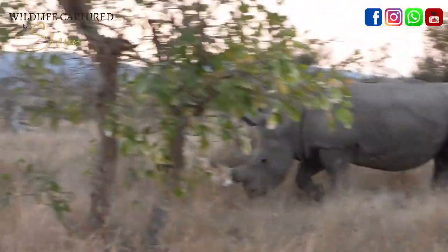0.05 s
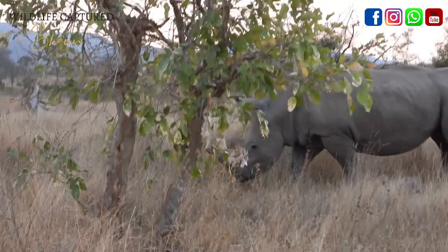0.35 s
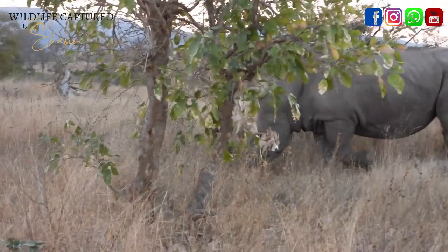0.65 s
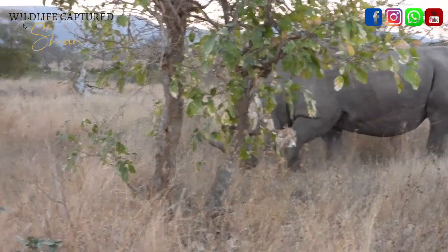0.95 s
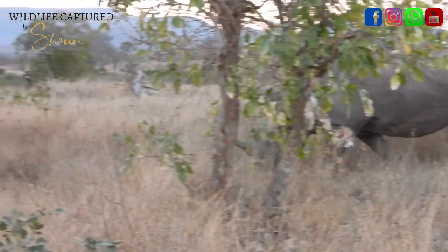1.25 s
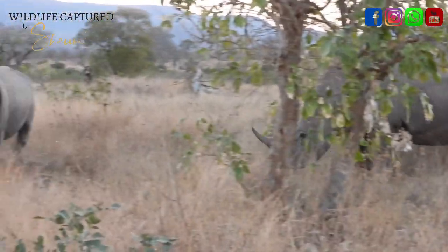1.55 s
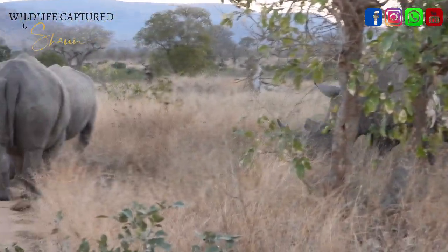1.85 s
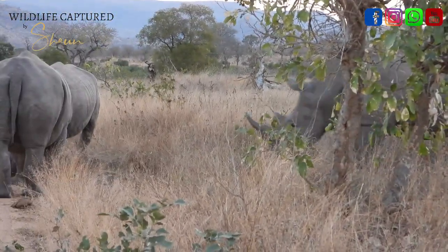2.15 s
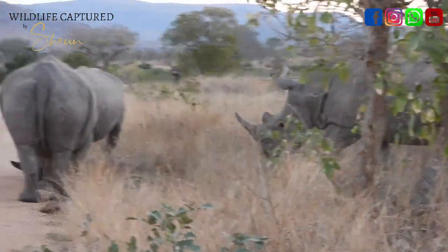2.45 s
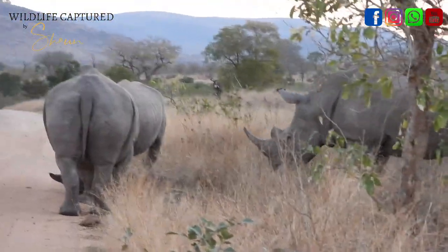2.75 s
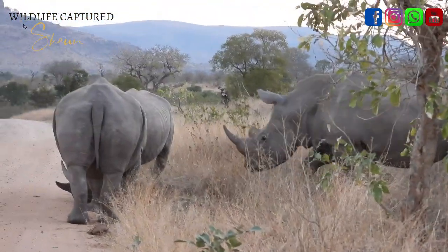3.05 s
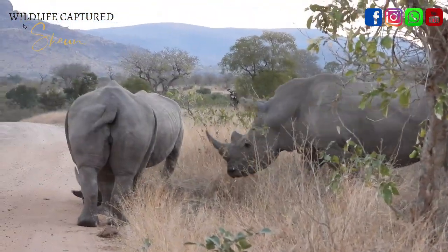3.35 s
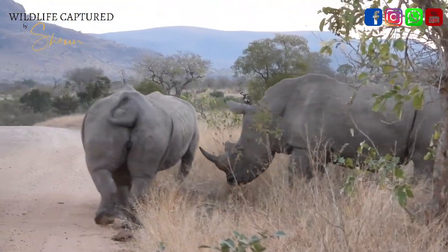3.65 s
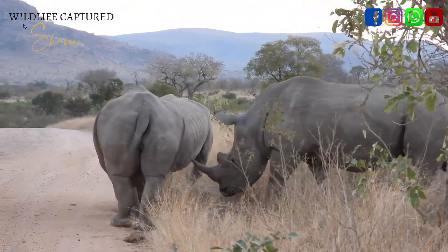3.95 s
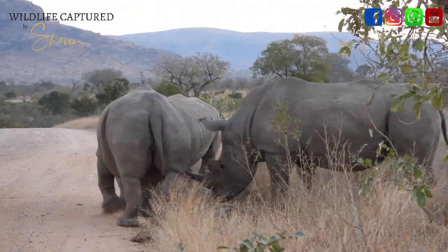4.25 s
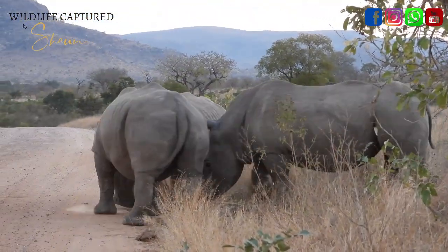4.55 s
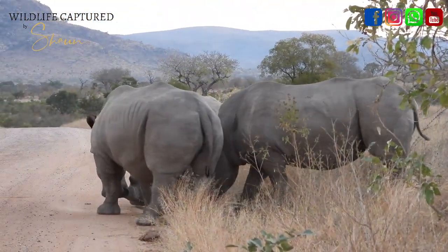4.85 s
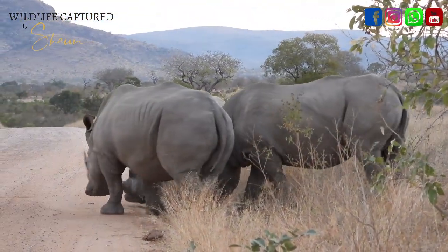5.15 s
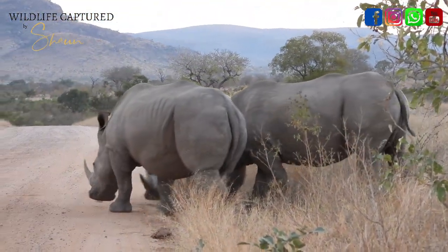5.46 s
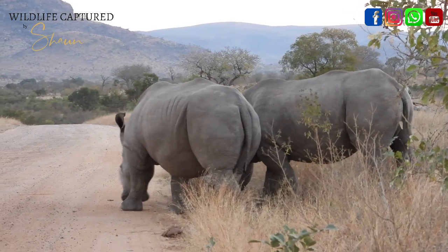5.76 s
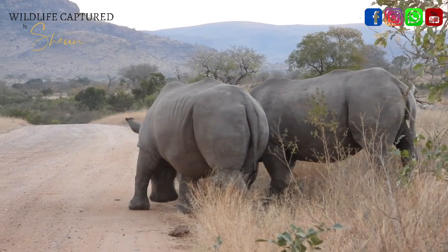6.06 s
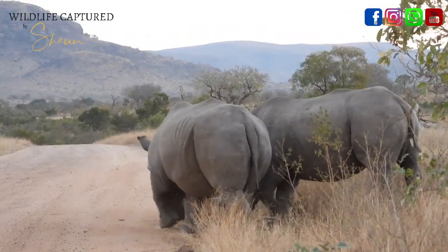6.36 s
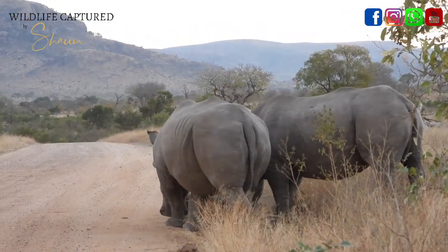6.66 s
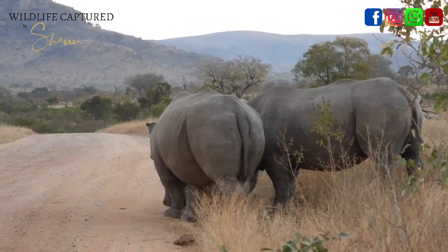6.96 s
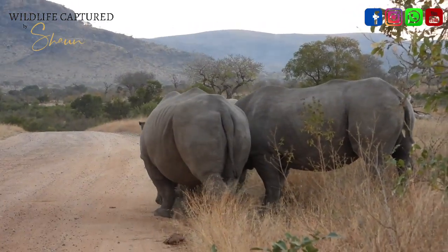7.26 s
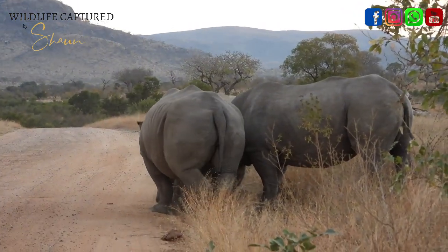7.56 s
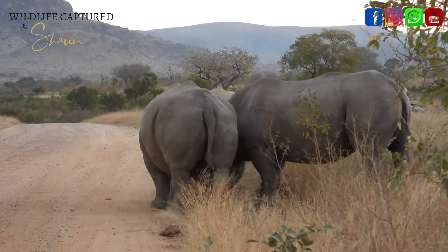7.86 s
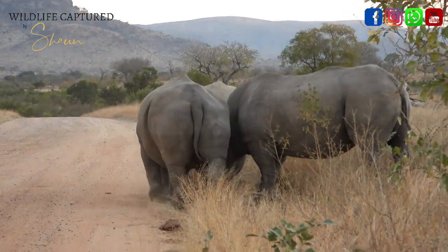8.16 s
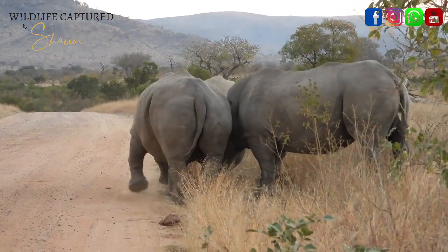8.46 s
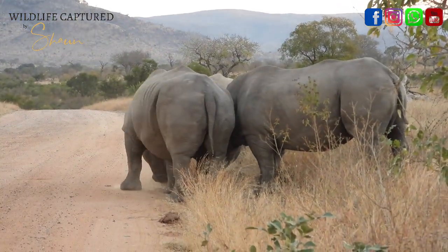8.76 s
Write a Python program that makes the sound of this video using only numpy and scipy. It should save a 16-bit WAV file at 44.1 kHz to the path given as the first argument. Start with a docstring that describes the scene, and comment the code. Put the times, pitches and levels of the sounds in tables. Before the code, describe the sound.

Rhinos shoving each other in open bush pant and squeal softly at first. Two creaking squeaks lead into loud, rasping squeals, two or three a second, which break into two falling runs of chatter. The loudest calls overload the microphone. Afterwards only soft whimpers, bird whistles, a little dry grass rustle and two thin distant squeals remain over a low outdoor rumble.

```python
"""An animal gives harsh squeals, breathy pants and falling runs of chatter over a low outdoor rumble.
It pants and squeals softly at first, turbulent breath ringing the resonances of the throat; a bird whistles.
Falling chatter, two creaking squeaks and whimpers lead to loud rasping squeals from 2.6 s, two or three
a second, which break into two more runs of chatter; the loudest calls overload the input.
After 6.5 s whimpers, birds and rustling dry grass remain, and two thin squeals sound far away."""
import sys
import numpy as np
from scipy import signal
from scipy.fft import rfft, irfft, next_fast_len
from scipy.io import wavfile

SR = 44100
rng = np.random.default_rng(int(sys.argv[2]) if len(sys.argv) > 2 else 0)


def inscribe(sig):
    """Save sig as 16-bit PCM at rate SR to the path in sys.argv[1].

    A 1-D sig is mono; a 2-D sig holds one channel per row.
    Samples are clipped to [-1, 1] before scaling.
    """
    pcm = np.round(np.clip(np.atleast_2d(sig).T, -1, 1) * 32767)
    wavfile.write(sys.argv[1], SR, pcm.astype(np.int16))


N = 388080
TIME, BINS = np.arange(N) / SR, np.fft.rfftfreq(N, 1 / SR)


def amp(db):
    """Amplitude ratio of a level in decibels."""
    return 10 ** (np.asarray(db) / 20)


def unit_rms(x):
    """Normalisation to unit mean power."""
    return x / np.sqrt(np.mean(x ** 2) + 1e-20)


def curve_at(points, hz):
    """Interpolation of (frequency, value) points on a logarithmic frequency axis."""
    f, value = np.transpose(points)
    return np.interp(np.log(hz + 1), np.log(f + 1), value)


def add(mix, start, sound):
    """Superposition: a sound joins the mix at a start time in seconds."""
    part = mix[max(0, round(start * SR)):][:len(sound)]
    part += sound[:len(part)]


def coloured(x, spectrum):
    """Spectral shaping by (frequency, level) points, at unit rms."""
    return unit_rms(irfft(rfft(x) * amp(curve_at(spectrum, np.fft.rfftfreq(len(x), 1 / SR))), len(x)))


def wander(size, hz):
    """Random modulation: complex noise low-passed near hz, at unit rms."""
    f = np.fft.fftfreq(next_fast_len(size), 1 / SR)
    noise = rng.standard_normal((len(f), 2)) @ [1, 1j]
    return unit_rms(np.fft.ifft(noise / (1 + abs(f / hz) ** 3))[:size])


def resonance(hz, width_hz):
    """A resonance driven by turbulence gives a band of noise, here centred on the curve hz."""
    carrier = np.exp(2j * np.pi * np.cumsum(hz) / SR)
    return unit_rms((wander(len(hz), width_hz * 0.74) * carrier).real)


def formants(modes, bend):
    """Parallel resonances, all shifted by the frequency ratio bend, at unit rms."""
    return unit_rms(sum(amp(db) * resonance(hz * bend, width) for hz, width, db in modes))


def swell(t, rise, fall):
    """Raised-cosine envelope, with rise and fall in seconds."""
    return np.sin(np.pi / 2 * np.clip(np.minimum(t / rise, (t[-1] - t) / fall), 0, 1)) ** 2


def puff(modes, length, db):
    """Noise excitation: a soft push of air through steady resonances."""
    t = np.arange(0, length, 1 / SR)
    return amp(db) * formants(modes, np.ones(len(t))) * swell(t, 0.3 * length, 0.57 * length)


# open-air spectrum: (frequency [Hz], relative level [dB])
AIR_SPECTRUM = [(20, 1), (35, -0.5), (70, -6.5), (130, -12.5), (200, -13), (320, -9), (480, -7), (800, -12),
                (1400, -14.5), (2500, -21), (4500, -25.5), (9000, -25.5), (13300, -19.5), (15800, -23)]
# likeness of the two channels: (frequency [Hz], correlation [0-1])
AIR_CORRELATION = [(60, 1), (180, 0.99), (450, 0.92), (1650, 0.79), (5000, 0.57), (10000, 1), (15000, 0.99)]
# level difference between the channels: (frequency [Hz], left minus right [dB])
AIR_BALANCE = [(60, 0.5), (130, -1.5), (300, 4), (1000, 4.5), (5000, 0.5), (10000, -0.5)]
# soft hiss around the calls: (frequency [Hz], relative level [dB])
HISS_SPECTRUM = [(200, -43), (520, -7.5), (900, -1.5), (1200, -16), (1500, -1), (1640, 4.5), (1900, -2.5),
                 (2250, -5.5), (2700, -12.5), (5200, -19.5), (7000, -23), (15000, -35)]
# envelope of that hiss: (time [s], level [dB])
HISS_ENVELOPE = [(0, -41), (1.1, -39), (1.4, -47.5), (1.8, -39.5), (5.4, -39.5), (7.2, -59), (8.8, -48)]


def open_air(air_db=-38.5, hum_hz=102, hum_db=-52.5):
    """Partly correlated noise makes a wide rumble; a wavering hum and a soft hiss lie in the centre."""
    mid, side, hiss = rng.standard_normal((3, N))
    correlation = np.clip(curve_at(AIR_CORRELATION, BINS), 0, 1)
    side = irfft(rfft(side) * np.sqrt((1 - correlation) / (1 + correlation)), N)
    wash = amp(air_db) * np.array([coloured(x, AIR_SPECTRUM) for x in (mid + side, mid - side)])
    balance = amp(np.outer([.5, -.5], curve_at(AIR_BALANCE, BINS)))
    wash = irfft(rfft(wash) * balance, N)
    hum = amp(hum_db) * resonance(np.full(N, hum_hz), width_hz=6.1)
    hiss = coloured(hiss, HISS_SPECTRUM) * amp(np.interp(TIME, *np.transpose(HISS_ENVELOPE)))
    return wash + hum + hiss


# bouts of panting: (time [s], breaths [count], level [dB])
PANTS = [(0, 1, -34), (0.174, 3, -33.5), (.742, 1, -35.5), (0.926, 2, -34.5), (1.505, 1, -40),
         (1.7, 1, -36), (3.911, 2, -35.5), (4.764, 5, -30.5)]
# throat resonances: (frequency [Hz], bandwidth [Hz], relative level [dB])
PANT_FORMANTS = [(1643, 330, 4), (2280, 450, 1.5), (3170, 1060, -2.5), (4760, 1100, -4.5)]


def pants(length=.074, period=.082):
    """Turbulent flow: quick, even breaths excite the broad resonances of the throat."""
    out = np.zeros(N)
    for start, count, db in PANTS:
        for k in range(round(count)):
            add(out, start + k * period, puff(PANT_FORMANTS, length, db))
    return out


def cry(length, db, *, main_hz, main_width_hz, second_hz, second_width_hz, second_db,
        chest, chest_db, rasp, rasp_db, rasp_follow, arch, sharp, whistle,
        flutter, flutter_hz, rise, fall, fade_db, settle_s=0.02573):
    """Source and filter: fluttering air rings the throat, whose resonances glide as the mouth moves."""
    t = np.arange(0, length, 1 / SR)
    position = 2 * t / length - 1
    bend = 1 + arch * (1 / 3 - position ** 2) + sharp * np.exp(-t / settle_s)
    # the main resonance partly locks into an unsteady whistle
    tone_hz = main_hz * bend * (1 + 0.03185 * wander(len(t), 150.4).real)
    tone = np.sqrt(2) * np.sin(2 * np.pi * np.cumsum(tone_hz) / SR)
    voice = np.sqrt(whistle) * tone + np.sqrt(1 - whistle) * resonance(main_hz * bend, main_width_hz)
    # the rest of the throat sounds in uneven spurts, and the whistle breaks through between them
    harsh = amp(second_db) * resonance(second_hz * bend, second_width_hz)
    harsh += amp(chest_db) * formants(chest, np.sqrt(bend))
    harsh += amp(rasp_db) * formants(rasp, bend ** rasp_follow)
    voice += harsh * unit_rms(np.exp(.25 * whistle * wander(len(t), 130).real))
    # slack folds chop the air at an uneven rate
    cycles = np.cumsum(flutter_hz * (1 + 0.426 * wander(len(t), 89.0).real)) / SR
    voice *= np.exp(flutter * np.cos(2 * np.pi * cycles))
    return amp(db + fade_db * position / 2) * unit_rms(voice) * swell(t, rise, fall)


# long calls: (time [s], duration [s], level [dB], main resonance [Hz], sharp start [fraction],
# whistle share [0-1])
SQUEALS = [(0.042, 0.12, -24.5, 1620, 0.16, 0.3), (0.545, 0.14, -24, 1623, 0.14, 0.13),
           (1.046, 0.15, -23.5, 1613, 0.12, 0.05), (1.563, 0.16, -23.5, 1646, .12, 0.26),
           (2.612, 0.076, -3, 1636, 0.33, 1), (2.912, 0.099, -2.5, 1697, .12, 0.8),
           (3.231, 0.12, -1.5, 1688, 0.19, 0.22), (3.623, 0.127, -1, 1683, .1, 0.47),
           (4.063, 0.136, 0, 1697, -0.0063, 0.31), (4.331, 0.067, -4, 1590, 0.0041, 0.7),
           (5.128, 0.15, -4, 1646, -.06, 0.22)]
# resonances below and above the main pair: (frequency [Hz], bandwidth [Hz], relative level [dB])
SQUEAL_CHEST = [(560.5, 220, -13.5), (866, 140, -7), (1100, 106, -2), (1387, 175, 1.5)]
SQUEAL_RASP = [(2764, 360, -0.5), (3880, 710, -3.5), (4680, 370, -0.5), (5194, 250, 2), (5610, 1160, -3),
               (8330, 940, -12), (11100, 5800, -8)]
# the throat tightens with effort: (level [dB], second resonance over main [ratio],
# second resonance [dB], chest [dB], rasp [dB], fade over the call [dB])
SQUEAL_EFFORT = [(-24, 1.32, -3.5, -6.5, -11.5, -6), (-2, 1.16, -5, -10.5, -7.5, -4.5)]


def squeals():
    """A narrow resonance makes the call piercing; vocal effort shifts energy from chest to rasp."""
    out = np.zeros(N)
    levels, *throat = np.transpose(SQUEAL_EFFORT)
    for start, length, db, hz, sharp, whistle in SQUEALS:
        ratio, second_db, chest_db, rasp_db, fade_db = (np.interp(db, levels, c) for c in throat)
        # softer calls show more of their thin upper edge and their breath
        edge, breath = (3180, 270, -6 - 0.45 * db), (7600, 1800, -19 - 0.57 * db)
        add(out, start, cry(
            length, db, main_hz=hz, main_width_hz=148,
            second_hz=hz * ratio, second_width_hz=300, second_db=second_db,
            chest=SQUEAL_CHEST, chest_db=chest_db,
            rasp=[edge, breath, *SQUEAL_RASP], rasp_db=rasp_db, rasp_follow=.9,
            arch=0.024, sharp=sharp, whistle=whistle, flutter=.12, flutter_hz=190,
            rise=0.033, fall=0.039, fade_db=fade_db))
    return out


# bird notes: (time [s], duration [s], level [dB], start pitch [Hz], end pitch [Hz])
BIRD_NOTES = [(1.367, .07, -55, 2700, 2340), (2.046, 0.05, -42, 3000, 2480), (2.282, 0.19, -51, 2990, 3000),
              (6.153, 0.071, -33.5, 3000, 2130), (6.454, 0.17, -45, 2960, 3000),
              (6.584, 0.077, -46, 2790, 2520), (6.652, 0.051, -45, 2680, 2480),
              (6.848, 0.12, -45, 2990, 2950), (7.273, 0.068, -36.5, 2840, 2110)]


def birds(arch_hz=78):
    """Frequency modulation: each whistle is a pure tone that glides, bowing upward in its middle."""
    out = np.zeros(N)
    for start, length, db, start_hz, end_hz in BIRD_NOTES:
        t = np.arange(0, length, 1 / SR)
        progress = t / length
        hz = start_hz + (end_hz - start_hz) * progress ** 1.5 + arch_hz * np.sin(np.pi * progress)
        hz *= 1 + .008 * wander(len(t), 200).real
        tone = np.sqrt(2) * np.sin(2 * np.pi * np.cumsum(hz) / SR)
        add(out, start, amp(db) * tone * swell(t, 0.31 * length, 0.14 * length))
    return out


# short notes in three falling runs: (time [s], duration [s], level [dB], main resonance [Hz])
CHATTER = [(1.806, 0.1, -19, 2150), (1.901, 0.073, -18, 2350), (1.98, 0.08, -21.5, 2086),
           (4.368, 0.108, 0.5, 1940), (4.47, 0.078, 0, 2176), (4.541, 0.082, -2.5, 2060),
           (4.623, 0.065, -5, 2120), (4.705, 0.06, -9.5, 1890), (5.421, 0.064, -12, 1410),
           (5.474, 0.1, -1.5, 1959), (5.57, 0.078, -1.1, 2035), (5.656, 0.073, -3.5, 1900),
           (5.742, 0.07, -7, 1753), (5.838, 0.064, -10.5, 1303), (5.933, 0.068, -15.5, 1174),
           (6.041, 0.065, -16.5, 1077), (6.151, 0.068, -16.5, 1081), (6.284, 0.065, -16.5, 1074),
           (6.423, 0.076, -18, 1080)]
# resonances below and above the main pair: (frequency [Hz], bandwidth [Hz], relative level [dB])
CHATTER_CHEST = [(332, 88, -9.5), (540.5, 280, -5), (886, 133, -1), (1109, 92, 3.5)]
CHATTER_RASP = [(2736, 580, 2.5), (3904, 430, -4), (4563, 280, -1), (4920, 430, -6.5), (5580, 280, -14.5),
                (6540, 1950, -10), (9640, 5900, -12)]


def chatter(shut_mouth_hz=1101):
    """Formant shift: a wider mouth lifts the resonances of each note and trades chest for rasp."""
    out = np.zeros(N)
    for start, length, db, hz in CHATTER:
        opening = np.log2(hz / shut_mouth_hz)  # octaves
        third = (2760 * 2 ** (0.24 * opening), 350, 0)
        add(out, start, cry(
            length, db, main_hz=hz, main_width_hz=260,
            second_hz=1451 * 2 ** (.25 * opening), second_width_hz=380, second_db=-1.5 + 0.29 * db,
            chest=CHATTER_CHEST, chest_db=-5 - 8 * opening,
            rasp=[third, *CHATTER_RASP], rasp_db=-8 + 10 * opening + 0.59 * db, rasp_follow=0.195,
            arch=0.069, sharp=-0.0599, whistle=0.049, flutter=.15, flutter_hz=260,
            rise=0.49 * length, fall=.5 * length, fade_db=-1.0))
    return out


# two squeaks that break into a creak, a list each: (time [s], pitch [Hz], level [dB], roughness [0-1])
SQUEAKS = [
    [(2.093, 297, -59, 0.23), (2.103, 253.7, -23, 0.11), (2.12, 169.5, -26.5, 0.4),
     (2.139, 153, -22.5, 0.2), (2.147, 140, -51, .4)],
    [(2.412, 824, -42, 0.11), (2.425, 898, -21, 0.12), (2.45, 782, -22, 0.17), (2.456, 326, -17, 0.23),
     (2.473, 278, -23.5, 0.37)],
]
# rising tone that leads into each loud squeal with a sharp start:
# (time from squeal onset [s], pitch [Hz], level relative to squeal [dB], roughness [0-1])
LEAD_IN = [(-.008, 883, -35, 0.13), (.005, 1000, -11.5, 0.08), (.015, 1065, -10, .15),
           (.023, 1050, -20, 0.5)]
# throat resonances: (frequency [Hz], bandwidth [Hz], relative level [dB])
SQUEAK_FORMANTS = [(243, 41, 1), (523, 72, -12), (910, 230, -3), (1580, 195, 5.5), (2140, 530, 3),
                   (2575, 300, -4), (3057, 200, -10), (5400, 510, -17)]


def squeaks():
    """Voicing: the folds pulse cleanly, then roughen; each pulse excites the throat's damped modes."""
    out, age = np.zeros(N), np.arange(1024) / SR
    throat = sum(amp(db) * width ** 2 * age * np.exp(-1.5 * np.pi * width * age)
                 * np.cos(2 * np.pi * hz * age) for hz, width, db in SQUEAK_FORMANTS)
    lead_ins = [np.add(LEAD_IN, (start, 0, db, 0)) for start, _, db, _, sharp, _ in SQUEALS
                if db > -10 and sharp > .05]
    for contour in SQUEAKS + lead_ins:
        times, *columns = np.transpose(contour)
        t = np.arange(times[0], times[-1], 1 / SR)
        hz, db, rough = (np.interp(t, times, c) for c in columns)
        cycles = np.cumsum(hz * (1 + 0.205 * rough * wander(len(t), 300).real)) / SR
        folds = sum(np.cos(2 * np.pi * k * cycles) * (k * hz < SR / 4) for k in range(1, 50))
        breath = np.exp(-(cycles % 1)) * rng.standard_normal(len(t))
        source = (1 - rough) * unit_rms(folds * np.sqrt(hz)) + rough * unit_rms(breath)
        voice = np.convolve(source, throat)[:len(t)]
        add(out, times[0], amp(db) * unit_rms(voice) * swell(t - t[0], .003, 0.0026))
    return out


# soft cries between and after the calls: (time [s], level [dB])
WHIMPERS = [(2.179, -30), (2.29, -29), (2.77, -25), (2.825, -31), (3.002, -28.5), (3.112, -32),
            (3.443, -32.5), (3.814, -33), (6.572, -35), (6.655, -38.5), (6.745, -37), (6.83, -34.5),
            (6.889, -35), (7.046, -35), (7.241, -39.5), (7.55, -44.5)]
# their upper resonances: (frequency [Hz], bandwidth [Hz], relative level [dB])
WHIMPER_FORMANTS = [(2900, 900, -14.5), (4780, 1000, -24)]


def whimpers(width_hz=430, hz_per_db=7):
    """Breath excites a broad main resonance, which lies lower in the softer whimpers."""
    out = np.zeros(N)
    for start, db in WHIMPERS:
        hz = 1383 + hz_per_db * (db + 30)
        add(out, start, puff([(hz, width_hz, 0), *WHIMPER_FORMANTS], length=.072, db=db))
    return out


# dry grass and twigs: (time [s], duration [s], level [dB], centre frequency [Hz])
RUSTLES = [(6.618, .022, -41, 5500), (7.6, .18, -49.5, 5500), (8.66, .13, -48.5, 4000)]


def grass():
    """Random amplitude modulation of broadband noise gives the rustle of dry stalks."""
    out = np.zeros(N)
    for start, length, db, hz in RUSTLES:
        t = np.arange(0, length, 1 / SR)
        stalks = resonance(np.full(len(t), hz), width_hz=4500) * np.exp(.3 * wander(len(t), 250).real)
        add(out, start, amp(db) * unit_rms(stalks) * swell(t, .35 * length, .6 * length))
    return out


# thin calls far away: (time [s], level [dB])
FAR_SQUEALS = [(8.524, -33), (8.775, -28.5)]


def far_squeals(hz=1592, width_hz=68):
    """Narrowband noise from a single resonance is heard as a thin pitch."""
    out = np.zeros(N)
    for start, db in FAR_SQUEALS:
        add(out, start, puff([(hz, width_hz, 0)], length=.058, db=db))
    return out


# decay of sound in the bush: (frequency [Hz], reverberation time [s])
BUSH_T60 = [(200, 0.24), (1000, 0.4), (1700, 0.18), (3000, 0.18), (6000, 0.29), (14000, 0.035)]
# reflections from the ground and nearby trunks: (delay [s], gain [ratio])
REFLECTIONS = [(.0061, 0.048), (0.0111, -0.16), (0.0178, .1)]


def bush_reverb(x, near_db=-14, near_t60=0.15, far_db=-23):
    """Reflection and scattering: quick returns from ground and trunks, then a faint tail from the bush."""
    hz, t, spectrum = signal.stft(rng.standard_normal(SR), SR, nperseg=256)
    decay = amp(-60 * t / curve_at(BUSH_T60, hz)[:, None])
    far = signal.istft(spectrum * decay, SR, nperseg=256)[1][:SR]
    t = np.arange(SR) / SR
    near = rng.standard_normal(SR) * amp(-60 * t / near_t60) * (t > .004)
    response = amp(near_db) * near / np.linalg.norm(near) + amp(far_db) * far / np.linalg.norm(far)
    for delay, gain in REFLECTIONS:
        add(response, delay, [gain])
    return signal.fftconvolve(x, response)[:N]


def scene():
    """Superposition: direct sound and its reverberation sit in the centre, over the open air."""
    direct = pants() + squeals() + birds() + chatter() + squeaks() + whimpers() + grass() + far_squeals()
    return direct + bush_reverb(direct) + open_air()


def record(dry, ceiling=.77, cutoff_hz=15900):
    """Saturation: the input overloads with a rounded knee, and a low-pass filter limits the band."""
    clipped = dry / (1 + (dry / ceiling) ** 6) ** (1 / 6)
    lowpass = signal.firwin(511, cutoff_hz, window=("kaiser", 9), fs=SR)
    return signal.oaconvolve(clipped, lowpass[None], "same")


dry = scene()
out = record(dry)
inscribe(out)
```